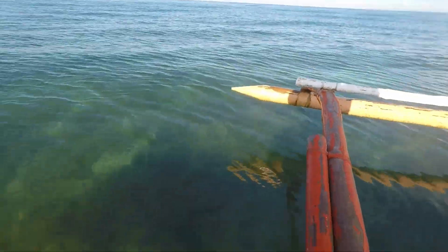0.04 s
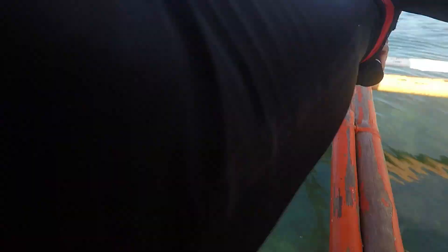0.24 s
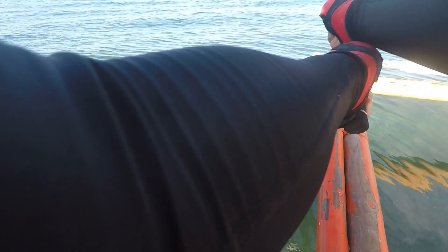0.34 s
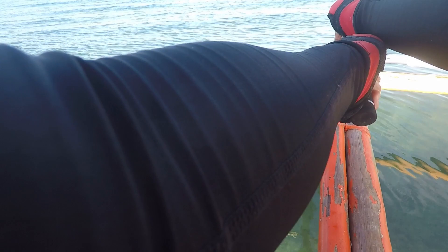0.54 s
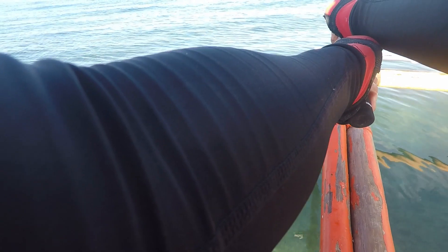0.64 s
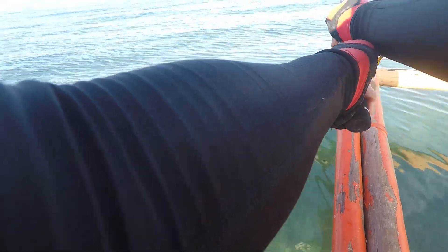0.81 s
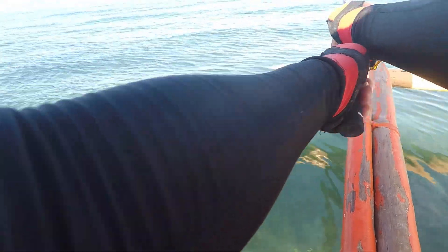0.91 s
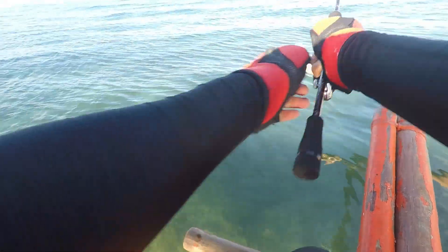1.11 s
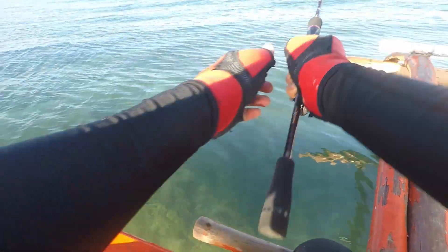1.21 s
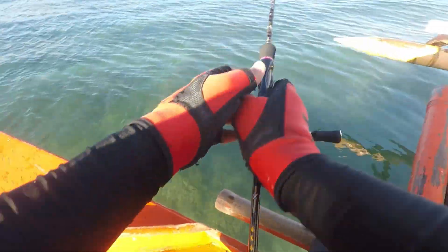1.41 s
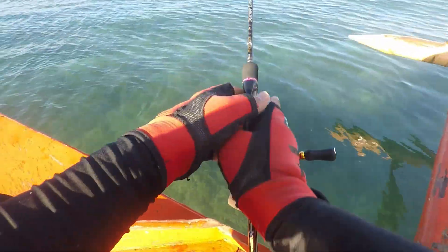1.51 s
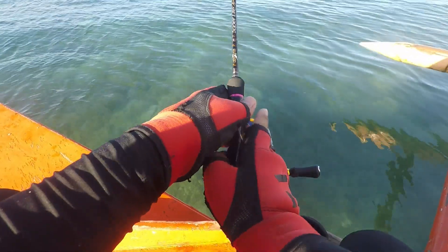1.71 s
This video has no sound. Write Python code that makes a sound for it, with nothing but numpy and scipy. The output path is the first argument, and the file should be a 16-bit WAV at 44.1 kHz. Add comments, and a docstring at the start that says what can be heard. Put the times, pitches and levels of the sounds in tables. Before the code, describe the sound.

A sleeve swishes and bumps against the microphone, then slides on softly over faint wind.

```python
"""An arm in a stretch sleeve swishes past a body-worn camera on a small boat, its threads slipping.
The cloth drags twice across the housing and knocks on it, squeezing air at the microphone port;
the loudest hits overload. A light brush follows, then the sleeve slides forward more softly and dulls
as it slows, while fishing gear ticks three times and the housing takes one last faint bump.
Underneath, all the way through: faint wind, calm water and the thin whine of the camera."""
import sys
import numpy as np
from scipy import signal
from scipy.fft import rfft, irfft
from scipy.io import wavfile
from scipy.ndimage import uniform_filter1d

SR = 44100
rng = np.random.default_rng(int(sys.argv[2]) if len(sys.argv) > 2 else 0)


def dump(signal):
    """Clip the signal to [-1, 1] and save it as 16-bit WAV at the path in sys.argv[1]."""
    limited = np.clip(np.atleast_2d(signal).T, -1, 1)
    pcm = np.round(limited * 32767).astype(np.int16)
    wavfile.write(sys.argv[1], SR, pcm)


N = 77175

# Fader rides for the sleeve's sweep past and its reach forward. Each row: time in seconds, level in dB.
SWEEP_FADER = [(0, -41.5), (.045, -38.5), (.09, -27), (.15, -30), (.198, -24.5), (.26, -32.5), (.33, -29.5),
               (.35, -41), (.385, -31.5), (.46, -37), (.49, -45), (.54, -42), (.58, -55), (.66, -53.5),
               (.70, -45.5), (.77, -79.5)]
REACH_FADER = [(.78, -64), (.88, -43), (1.0, -36.5), (1.11, -36), (1.22, -36.5), (1.32, -34.5),
               (1.39, -39.5), (1.52, -39), (1.59, -45), (1.64, -47.5), (1.75, -57.5)]
# Tone of those two moves. Each row: frequency in Hz, relative level in dB.
SWEEP_EQ = [(60, -7), (130, 0), (240, -1.5), (420, -7.5), (680, -2), (1100, -7.5), (1400, -8.5),
            (1700, -9.5), (2000, -7.5), (3000, -17), (4500, -24.5), (5600, -43), (9000, -66), (15000, -62)]
REACH_EQ = [(60, 3), (250, -3.5), (430, -9.5), (700, -6.5), (1150, -8), (1650, -12.5), (2000, -10),
            (3000, -20), (4400, -26.5), (5800, -41), (15000, -44)]
# Cloth dragged over the housing. Each row: peak time in seconds, level in dB,
# rise and fall in seconds, chatter pitch in Hz.
DRAGS = [(.2315, -11, .011, .007, 1370), (.303, -8.5, .0055, .0065, 1170)]
# Fabric hissing on the port. Each row: start and end in seconds, level in dB.
PORT_HISSES = [(0.22, 0.244, -41), (0.28, 0.325, -33.5)]
# Tone of the drags, the hiss and the parting brush. Each row: frequency in Hz, relative level in dB.
DRAG_EQ = [(60, -2.5), (250, 1.5), (420, -13.5), (650, -5.5), (1300, -4), (1800, -12), (2700, -13.5),
           (3600, -12.5), (4600, -16), (6000, -31.5), (9500, -40), (15000, -47)]
HISS_EQ = [(1000, -5), (4300, 3.5), (5700, -9.5), (9700, -3.5), (12000, -16), (15000, -10.5)]
BRUSH_EQ = [(300, -32), (750, 4), (1600, 4.5), (2500, 0.5), (4300, -14), (5800, -34), (15000, -49)]
# Knocks on the housing and thumps of air squeezed at the port.
# Each row: start in seconds, level in dB, pitch in Hz, seconds to die away by 60 dB.
KNOCKS = [(0.2054, 2.5, 940, 0.0078), (.2215, -7.5, 453, 0.039), (.2497, -4, 575, 0.034),
          (.262, 4.5, 720, 0.0047), (.2635, 6.5, 194, 0.012), (0.2934, -4, 286, 0.014),
          (.3035, -1, 568, 0.041), (.3165, -2.5, 714, 0.011), (.3185, 1, 222.2, 0.023),
          (1.535, -31.5, 295, 0.027)]
AIR_THUMPS = [(0.154, -14, 30, 0.99), (0.218, -1, 54.6, 0.174), (0.247, 0.5, 55.2, 0.21),
              (.298, -3.5, 32.6, 0.19), (0.309, -7, 107, 0.038)]
# The housing's resonances. Each row: centre and width in Hz, level of the added ring in dB.
HOUSING_MODES = [(588, 70, 3), (1124, 94, 2), (2530, 120, -5), (3490, 120, -3.5), (5420, 70, -4)]
# The hollows between them. Each row: centre and width in Hz.
HOUSING_HOLLOWS = [(440, 31), (1740, 75), (2260, 99)]
# Fishing gear. Each row: peak time in seconds, level in dB, centre in Hz, rise and fall in seconds.
GEAR_TICKS = [(.9042, -38, 4450, 0.0007, 0.0011), (1.3175, -41, 3610, .0008, 0.0025),
              (1.35, -38, 2570, 0.001, 0.0025)]
# Wind buffeting the port. Each row: time in seconds, level in dB.
WIND_FADER = [(0, -38.5), (.1, -30.5), (.19, -29.5), (.25, -23), (.31, -32), (.37, -29.5), (.48, -34.5),
              (.66, -41), (.88, -49), (1.02, -47), (1.33, -41), (1.5, -38), (1.63, -33.5), (1.75, -37)]
# Tone of the wind and the distant water. Each row: frequency in Hz, relative level in dB.
WIND_EQ = [(10, 1.5), (28, 7.5), (60, -5), (100, -7.5), (170, -23.5), (400, -40.5), (1500, -50)]
WATER_EQ = [(40, 1.5), (150, -1.5), (400, -7.5), (620, -15), (1150, -7.5), (1700, -16), (3500, -18.5),
            (6000, -25), (10000, -30), (15000, -32)]


def sleeve():
    """The cloth swishes past, then slides forward and loses its treble as it slows."""
    sweep = friction(SWEEP_EQ, slips_per_s=1200, slip_db=-3.5, flutter_hz=111, flutter_db=-0.46)
    reach = friction(REACH_EQ, slips_per_s=2500, slip_db=-8, flutter_hz=117.3, flutter_db=0.95)
    sweep *= fader(SWEEP_FADER)
    reach *= fader(REACH_FADER)
    dull_from_s, dull_db_per_s, crossover_hz = 1.137, 18, 1570
    body = signal.sosfiltfilt(signal.butter(4, crossover_hz, fs=SR, output="sos"), reach)
    treble_fade = undb(-dull_db_per_s * np.maximum(clock() - dull_from_s, 0))
    return sweep + body + (reach - body) * treble_fade


def friction(eq, slips_per_s, slip_db, flutter_hz, flutter_db):
    """Tiny slips of threads over a smooth rub, gripping unevenly and ringing the housing."""
    slips = (rng.random(N) < slips_per_s / SR) * rng.standard_normal(N)
    rub = rng.standard_normal(N) + undb(slip_db) * unit(slips)
    grip = undb(flutter_db * wobble(flutter_hz))
    return colour(through_housing(rub * grip), eq)


def drags():
    """The sleeve catches on the housing: a rough rasp with chatter tucked under it."""
    rasp = friction(DRAG_EQ, slips_per_s=650, slip_db=0.5, flutter_hz=399.16, flutter_db=0.5)
    return sum((rasp + undb(-8) * chatter(hz)) * swell(at, db, rise, fall)
               for at, db, rise, fall, hz in DRAGS)


def chatter(hz):
    """Stick-slip of taut cloth: a tone that shakes in pitch and level."""
    pitch = hz * (1 + 0.1003 * wobble(700))
    tone = np.sqrt(2) * np.sin(2 * np.pi * np.cumsum(pitch) / SR)
    return tone * undb(4.7 * wobble(400))


def hiss(edge_s=0.004):
    """Fabric on the port adds a fine sizzle to each drag."""
    t = clock()
    touch = sum(undb(db) * np.exp(-np.abs(t - np.clip(t, start, end)) / edge_s)
                for start, end, db in PORT_HISSES)
    return touch * wash(HISS_EQ, flutter_hz=500, flutter_db=1.2)


def brush():
    """A light touch of the sleeve as it leaves the housing."""
    return swell(at=0.3752, db=-27, rise=0.0015, fall=0.009) * colour(rng.standard_normal(N), BRUSH_EQ)


def bumps():
    """The arm knocks the housing into a dull ring; squeezed air puts deep thumps underneath."""
    knocks = sum(hit(*row, attack_s=0.00021) for row in KNOCKS)
    thumps = sum(hit(*row, attack_s=0.0033) for row in AIR_THUMPS)
    return knocks + undb(-14) * housing_ring(knocks) + thumps


def hit(at, db, hz, t60, attack_s):
    """One damped swing set off by a soft push."""
    t = np.maximum(clock() - at, 0)
    envelope = (1 - np.exp(-t / attack_s)) * np.exp(-np.log(1000) * t / t60)
    return undb(db) * envelope * np.sin(2 * np.pi * hz * t)


def through_housing(x, scoop_depth=0.63):
    """The housing scoops out its hollows and rings at its resonances."""
    scooped = x - scoop_depth * sum(resonate(x, hz, width) for hz, width in HOUSING_HOLLOWS)
    return scooped + housing_ring(scooped)


def housing_ring(x):
    """What the housing's resonances add to a sound."""
    return sum(undb(db) * resonate(x, hz, width) for hz, width, db in HOUSING_MODES)


def gear_ticks(edge_ratio=1.08):
    """Short clicks of the rod and reel, each in its own narrow band."""
    out = 0
    for at, db, hz, rise, fall in GEAR_TICKS:
        band = signal.butter(2, [hz / edge_ratio, hz * edge_ratio], "band", fs=SR, output="sos")
        click = unit(signal.sosfilt(band, rng.standard_normal(N)))
        out += click * swell(at, db, rise, fall)
    return out


def wind():
    """Air buffets the port with a low, uneven rumble."""
    return fader(WIND_FADER) * wash(WIND_EQ, flutter_hz=24.93, flutter_db=0.65)


def water():
    """A quiet bed of calm, distant water."""
    return undb(-47.5) * wash(WATER_EQ, flutter_hz=9.36, flutter_db=0.9)


def whine(hz=8631):
    """The camera's electronics hold a thin, steady tone."""
    return undb(-73) * unit(np.sin(2 * np.pi * hz * clock()))


def wash(eq, flutter_hz, flutter_db):
    """Coloured noise with a fluttering level."""
    return colour(rng.standard_normal(N) * undb(flutter_db * wobble(flutter_hz)), eq)


def colour(x, eq):
    """Shape with an EQ curve, then scale to rms 1."""
    hz, db = np.array(eq).T
    bin_hz = np.maximum(np.arange(N + 1) * SR / (2 * N), 1)
    gain = undb(np.interp(np.log(bin_hz), np.log(hz), db))
    return unit(irfft(rfft(x, 2 * N) * gain)[:N])


def resonate(x, hz, width):
    """One resonant band of a sound."""
    return signal.lfilter(*signal.iirpeak(hz, hz / width, fs=SR), x)


def wobble(rate_hz):
    """Smooth random modulation at rms 1."""
    hold = max(int(SR / rate_hz), 2)
    steps = np.repeat(rng.standard_normal(N // hold + 1), hold)
    return unit(uniform_filter1d(steps, hold)[:N])


def swell(at, db, rise, fall):
    """Envelope of a contact that grows to a peak and lets go."""
    t = clock() - at
    return undb(db) * np.exp(-np.maximum(-t / rise, t / fall))


def fader(curve):
    """Gain along a fader ride."""
    return undb(np.interp(clock(), *np.array(curve).T))


def undb(db):
    """Decibels to gain."""
    return 10 ** (np.asarray(db) / 20)


def unit(x):
    """Scale to rms 1."""
    return x / np.sqrt(np.mean(x ** 2))


def clock():
    """Time of every sample in seconds."""
    return np.arange(N) / SR


def scene():
    """The mono mix at the camera's microphone."""
    cloth = sleeve() + drags() + hiss() + brush()
    return (cloth + bumps() + gear_ticks() + wind() + water() + whine())[None]


def record(dry):
    """The overloaded microphone flattens the loudest peaks; a steep low-pass cuts the top."""
    knee, top_hz = 12, 15250
    clipped = dry / (1 + np.abs(dry) ** knee) ** (1 / knee)
    return signal.sosfilt(signal.ellip(10, 0.2, 80, top_hz, fs=SR, output="sos"), clipped)


dry = scene()
out = record(dry)
dump(out)
```